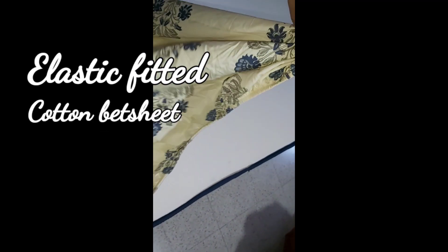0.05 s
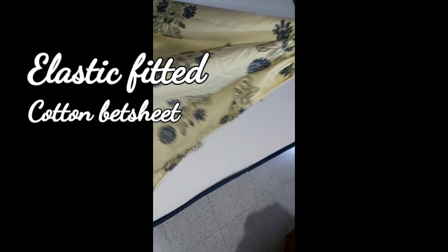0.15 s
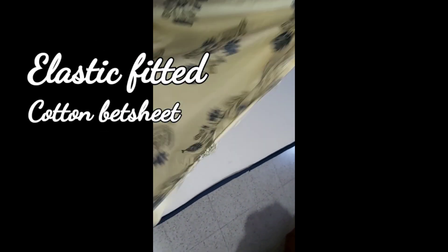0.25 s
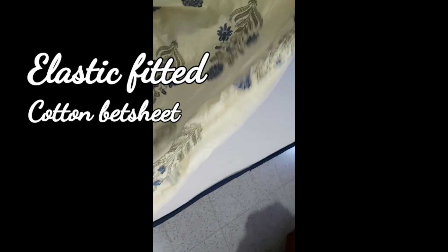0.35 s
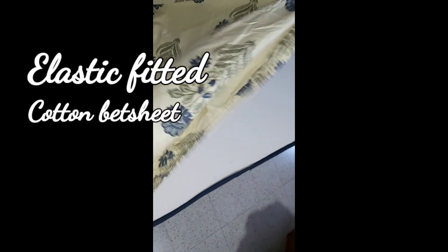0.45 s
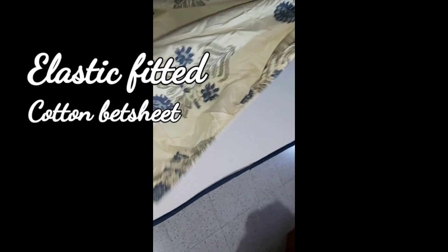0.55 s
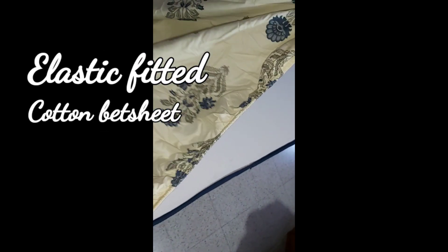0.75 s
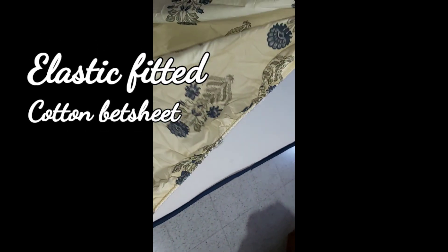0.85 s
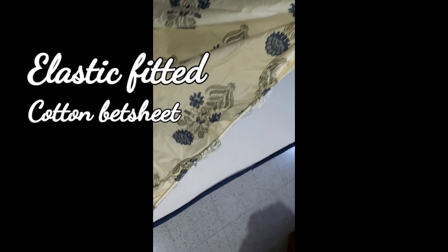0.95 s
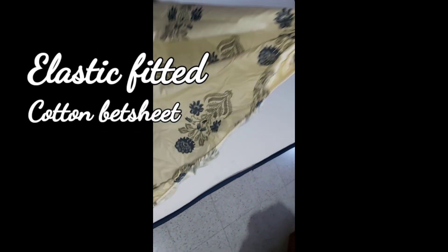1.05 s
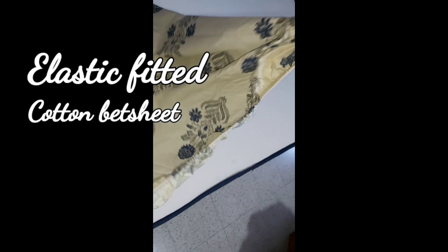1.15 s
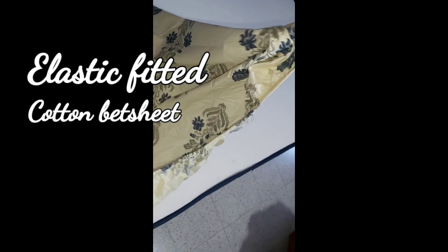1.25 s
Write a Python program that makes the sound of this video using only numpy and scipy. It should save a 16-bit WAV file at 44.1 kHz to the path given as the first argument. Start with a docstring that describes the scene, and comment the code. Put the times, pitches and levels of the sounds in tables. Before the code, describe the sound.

A cotton sheet flaps and lands on a mattress in a small room. Quiet wavering low hum, room noise and a very faint thin high trill come first. From 0.3 to 0.49 seconds, rapid irregular cloth snaps and air puffs, densest near 0.44 with a dull thump and rush of air. A short room ring fades; from about 1.0 a faint fabric hiss rises until 1.3.

```python
"""Cotton sheet flung over a mattress

A sheet flies with a rush and a grainy swish (shaped noise); its folds flap taut (pressure pulses, cracks,
noise bursts), it lands with a thump (decaying modes) and flaps and thump ring a small room (convolution).
Then it is drawn along the bed with a hiss. Behind: a wavering low hum (sine), room noise with a faint
mid drone (shaped noise) and a thin high trill (two narrow fluttering noise bands)."""
import sys
import numpy as np
from scipy import signal
from scipy.fft import rfft, irfft
from scipy.io import wavfile
from scipy.ndimage import uniform_filter1d

SR = 44100
rng = np.random.default_rng(int(sys.argv[2]) if len(sys.argv) > 2 else 0)


def wav_record(signal):
    """Record a signal, one row per channel, as 16-bit PCM in the file named by sys.argv[1]."""
    frames = np.transpose(np.atleast_2d(signal))
    bounded = np.clip(frames, -1, 1)
    # unit amplitude maps onto the largest positive 16-bit level
    quanta = np.round(bounded * 32767).astype(np.int16)
    wavfile.write(sys.argv[1], SR, quanta)


N = 57330

# steady room noise, colour: (frequency [Hz], relative level [dB])
AIR_COLOUR = [(20, -1), (60, -2), (130, 3.5), (215, -6.5), (320, -2.5), (450, -7), (800, -7.5),
              (1100, -5.5), (1550, -8), (2100, -19.5), (3000, -28.5), (5500, -39.5), (15000, -35.5)]
AIR_DB, AIR_PAN_DB = -59.5, -5
# faint mid drone, colour: (frequency [Hz], relative level [dB])
DRONE_COLOUR = [(150, -33), (270, -6.5), (310, -6), (340, 1), (375, -29.5), (600, -51.5)]
# drone envelope: (time [s], level [dB])
DRONE_LEVEL = [(0, -69), (.5, -48), (.6, -60), (.85, -60), (.97, -74), (1.06, -62), (1.3, -60.5)]
# low hum: (time [s], frequency [Hz], level [dB])
HUM_TRACK = [(0, 64.8, -50.5), (.05, 64.9, -60.5), (.21, 63.5, -46.5), (.42, 64.5, -45), (.52, 65.9, -55.5),
             (.62, 69.2, -45.5), (.70, 70.3, -61), (.775, 69.3, -49), (.85, 70.4, -72), (1.08, 67.9, -76.5),
             (1.15, 66.1, -49.5), (1.205, 62, -64.5), (1.26, 63, -50), (1.3, 67, -53)]
HUM_PAN_DB = -6
# thin trill: (time [s], lower band level [dB], upper band level [dB])
TRILL_LEVELS = [(0, -61.5, -80), (.12, -64.5, -76.5), (.25, -70.5, -70.5), (.33, -67.5, -74.5),
                (.5, -79, -73), (.76, -86, -74), (.92, -88, -83.5), (1.03, -91, -80.5), (1.06, -88, -85),
                (1.3, -88, -90)]
TRILL_HZ, TRILL_WIDTH_HZ = (4094, 4557), (210, 92)
TRILL_FLUTTER_DB, TRILL_FLUTTER_HZ = 1.56, 39

# sheet drawn along the mattress, colour: (frequency [Hz], relative level [dB])
DRAG_COLOUR = [(300, -5), (1500, 14.5), (2300, 4), (3050, -7), (3550, 8.5), (4100, -1), (5300, -1),
               (6500, -2), (8000, 3), (9500, -4.5), (11000, -3.5), (13700, -6), (15000, -1), (16000, -14)]
DRAG_START_S, DRAG_RISE_S, DRAG_DB, DRAG_PAN_DB = 1.01, 0.2, -62, -3
DRAG_GRAIN_DB, DRAG_GRAIN_HZ = 0.82, 200
# rush of air under the flying sheet: (time [s], level [dB])
RUSH_LEVEL = [(0, -55), (.27, -63), (.32, -48.5), (.40, -47), (.445, -32.5), (.49, -56.5), (.56, -53.5),
              (.68, -57), (.85, -65.5), (.915, -61), (.95, -92), (1.04, -83), (1.14, -63), (1.3, -57.5)]
# rush colour: (frequency [Hz], relative level [dB])
RUSH_COLOUR = [(20, -25), (45, -14.5), (120, -2.5), (220, -12), (320, -12.5), (450, -15.5), (900, -25.5),
               (2000, -31.5), (4000, -52), (15000, -48)]
RUSH_PAN_DB = -1.5
# cloth sliding on cloth: (time [s], level [dB])
SWISH_LEVEL = [(0, -66.5), (.1, -69.5), (.24, -78), (.28, -71), (.325, -64.5), (.40, -64), (.438, -58.5),
               (.48, -63), (.55, -72.5), (.66, -78.5), (.8, -77.5), (.95, -85), (1.3, -78)]
# swish colour: (frequency [Hz], relative level [dB])
SWISH_COLOUR = [(300, 0), (1500, -0.5), (2200, 8), (3000, -7.5), (3700, 0), (5300, -4.5), (6500, -0.5),
                (8000, 3), (9500, -2.5), (12500, -7), (15500, -12.5)]
SWISH_GRAIN_DB, SWISH_GRAIN_HZ, SWISH_PAN_DB = 1.6, 1300, -5.8

# bed and room resonances set off by the landing: (frequency [Hz], relative level [dB], T60 [s])
MATTRESS_MODES = [(60.3, 0.5, 0.15), (81, -7.5, 0.06), (112, -2.5, 0.19), (190, -7, 0.21), (294.7, 4, 0.19)]
THUMP_S, THUMP_DB, THUMP_ATTACK_S = 0.4345, -32, 0.0103
# folds flapping taut:
# (time [s], air pulse level [dB], pulse half-width [s], cloth snap level [dB], left minus right [dB])
FLAPS = [(0.3025, -70, .0008, -42.5, -21), (0.3039, -36, 0.00074, -56, -0.5),
         (0.3069, -35.5, 0.0012, -64, -11), (0.3556, -26.5, 0.00082, -51, -2),
         (0.376, -30, 0.00085, -59.5, -4), (0.3799, -32.5, 0.00056, -61, -1.5),
         (0.4127, -55, 0.00066, -48, -2), (0.4173, -42.5, 0.00035, -34.5, 0),
         (0.4206, -34.5, 0.0016, -54, -1), (0.4378, -25, 0.0008, -40.5, 11.5),
         (0.4392, -56, 0.00027, -27.5, -11.5), (0.4445, -34, 0.00074, -34.5, -3),
         (0.4505, -28, 0.0015, -40.5, 2), (0.466, -42, 0.00112, -37.5, 3.5),
         (0.4719, -42, 0.00035, -45.5, 22), (0.4757, -31.5, 0.00091, -61, 4.5),
         (0.4785, -46, 0.00026, -54, -7), (0.4860, -37, 0.00045, -47.5, -4)]
PULSE_SKEW = 0.16  # pressure swells more after the dip than before it
CRACK_DB, CRACK_WIDTH_S, CRACK_LEFT_LEAD_S = 0.5, 0.00024, 0.00038  # level re snap
SNAP_LEAD_S, SNAP_ATTACK_S, SNAP_DECAY_S = 0.0013, 0.0009, 0.0026
# filter on the snap noise: (frequency [Hz], gain [dB])
SNAP_COLOUR = [(200, 9), (450, -1), (800, 14.5), (1400, 10), (2000, 8), (2800, -9.5), (4200, -8.5),
               (5500, -23), (15000, -47)]

# standing waves of the room: (frequency [Hz], level [dB], T60 [s])
ROOM_MODES = [(289.3, -55.5, 0.16), (361.2, -85, 0.27), (554, -64, 0.15), (795, -74, 0.24)]
# reverberant tail, colour: (frequency [Hz], relative level [dB])
ROOM_COLOUR = [(50, -2), (130, -20), (300, -11.5), (700, 0), (2000, -0.5), (6000, 3.5), (15000, -14.5)]
ROOM_T60_S, ROOM_DB, ROOM_DELAY_S = 0.36, -7.5, 0.006
# likeness of the two channels of each noise: (frequency [Hz], correlation [-1..1])
LIKENESS = [(60, 1), (300, 0.83), (550, 0.46), (900, -0.087), (2000, 0.11), (6000, 0.034)]
# colour difference of the two microphones: (frequency [Hz], left minus right [dB])
MICROPHONE_COLOUR = [(100, -0.5), (300, -0.5), (500, 1.5), (800, -2), (1100, 1.5), (1800, -2), (3300, -4.5),
                     (4400, 5), (6000, 4), (8000, -1.5), (12000, 5.5), (15500, 0.5)]
TOP_HZ = 15700


def undb(db):
    """Decibels to gain."""
    return 10 ** (np.asarray(db) / 20)


def unit(x):
    """Scale to rms 1."""
    return x / np.sqrt(np.mean(x ** 2))


def curve(table, column=1):
    """One table column, linearly interpolated in time."""
    rows = np.array(table)
    return np.interp(np.arange(N) / SR, rows[:, 0], rows[:, column])


def by_frequency(points):
    """(Hz, value) points interpolated on a log-frequency axis."""
    hz, value = np.array(points).T
    bins_hz = np.fft.rfftfreq(N, 1 / SR) + 1  # offset avoids log(0)
    return np.interp(np.log(bins_hz), np.log(hz), value)


def colour(x, points):
    """Filter by (Hz, dB) points."""
    return irfft(rfft(x) * undb(by_frequency(points)), N)


def pan(db):
    """Left and right gains for a level difference, mean power 1."""
    gains = undb(np.array([[db], [-db]]) / 2)
    return gains / np.sqrt(np.mean(gains ** 2))


def noise(points):
    """Coloured stereo noise of rms 1, alike in the bass and nearly unrelated in the treble."""
    like = np.clip(by_frequency(LIKENESS), -1, 1)
    mid, side = rfft(rng.standard_normal((2, N))) * np.sqrt([1 + like, 1 - like])
    stereo = irfft(np.array([mid + side, mid - side]), N)
    return unit(colour(stereo, points))


def flicker(rate_hz):
    """Smoothed random wander of rms 1: white noise averaged over 1 / rate_hz."""
    window = max(int(SR / rate_hz), 1)
    return unit(uniform_filter1d(rng.standard_normal(N), window))


def decay(t, t60_s):
    """Exponential decay, 60 dB down at t60_s."""
    return np.exp(-np.log(1000) * t / t60_s)


def ring(modes, t):
    """Sum of decaying sines, one per mode."""
    return sum(undb(db) * np.sin(2 * np.pi * hz * t) * decay(t, t60_s) for hz, db, t60_s in modes)


def room_noise():
    """Steady broadband noise plus a narrower mid drone that swells and fades."""
    steady = noise(AIR_COLOUR) * undb(AIR_DB)
    drone = noise(DRONE_COLOUR) * undb(curve(DRONE_LEVEL))
    return (steady + drone) * pan(AIR_PAN_DB)


def hum():
    """A low sine that swells, fades and wavers in pitch: phase is the integral of frequency."""
    phase = 2 * np.pi * np.cumsum(curve(HUM_TRACK, column=1)) / SR
    tone = np.sqrt(2) * np.sin(phase)  # rms 1
    return tone * undb(curve(HUM_TRACK, column=2)) * pan(HUM_PAN_DB)


def trill():
    """Two narrow high noise bands with randomly fluttering levels."""
    bins_hz = np.fft.rfftfreq(N, 1 / SR)
    out = np.zeros((2, N))
    for column, (hz, width_hz) in enumerate(zip(TRILL_HZ, TRILL_WIDTH_HZ), start=1):
        bell = np.exp(-((bins_hz - hz) / width_hz) ** 2 / 2)
        band = unit(irfft(rfft(rng.standard_normal((2, N))) * bell, N))
        level_db = curve(TRILL_LEVELS, column) + TRILL_FLUTTER_DB * flicker(TRILL_FLUTTER_HZ)
        out += band * undb(level_db)
    return out


def drag(t):
    """Cotton pulled over the mattress cover: friction hiss that ramps up, then holds with a slight grain."""
    ramp = np.clip((t - DRAG_START_S) / DRAG_RISE_S, 0, 1)
    level_db = DRAG_DB + DRAG_GRAIN_DB * flicker(DRAG_GRAIN_HZ)
    return noise(DRAG_COLOUR) * ramp * undb(level_db) * pan(DRAG_PAN_DB)


def air_rush():
    """Air moved by the flying sheet: low noise following the rush envelope."""
    return noise(RUSH_COLOUR) * undb(curve(RUSH_LEVEL)) * pan(RUSH_PAN_DB)


def swish():
    """Weave sliding on weave: noise with a fast random grain in level."""
    level_db = curve(SWISH_LEVEL) + SWISH_GRAIN_DB * flicker(SWISH_GRAIN_HZ)
    return noise(SWISH_COLOUR) * undb(level_db) * pan(SWISH_PAN_DB)


def thump(t):
    """The sheet pushes its cushion of air onto the mattress, exciting decaying modes."""
    age = np.maximum(t - THUMP_S, 0)
    attack = np.minimum(age / THUMP_ATTACK_S, 1)
    return undb(THUMP_DB) * attack * ring(MATTRESS_MODES, age)


def pressure_pulse(t, width_s):
    """Pressure swells, dips at t = 0 and rebounds: a skewed second derivative of a Gaussian."""
    u = t / width_s
    return (u ** 2 - 1) * (1 + PULSE_SKEW * u) * np.exp(-u ** 2 / 2)


def crack(t):
    """A sharp stereo up-down pressure stroke, earlier on the left."""
    v = (t + CRACK_LEFT_LEAD_S * np.array([[1], [0]])) / CRACK_WIDTH_S
    return undb(CRACK_DB) * -v * np.exp((1 - v ** 2) / 2)


def snap_envelope(t):
    """Cloth noise burst: linear attack starting just before the flap, exponential decay."""
    age = np.maximum(t + SNAP_LEAD_S, 0)
    return np.minimum(age / SNAP_ATTACK_S, 1) * np.exp(-age / SNAP_DECAY_S)


def flaps(t):
    """Each fold pulled taut gives a pressure pulse, a crack and a short burst of cloth noise."""
    air, rub = np.zeros((2, N)), np.zeros((2, N))
    for at_s, pulse_db, width_s, snap_db, pan_db in FLAPS:
        since = t - at_s
        pulse = undb(pulse_db) * pressure_pulse(since, width_s)
        air += pan(pan_db) * (pulse + undb(snap_db) * crack(since))
        rub += pan(pan_db) * undb(snap_db) * snap_envelope(since)
    return air + colour(rub * rng.standard_normal((2, N)), SNAP_COLOUR)


def room(x, t):
    """Reverberation: convolution with a decaying diffuse tail and a few standing waves."""
    tail = noise(ROOM_COLOUR) * decay(t, ROOM_T60_S) * (t > ROOM_DELAY_S)
    tail = unit(tail) / np.sqrt(N)  # mean energy per channel 1
    response = undb(ROOM_DB) * tail + ring(ROOM_MODES, t)
    return signal.fftconvolve(x, response, axes=1)[:, :N]


def scene():
    """Background, sliding cloth, then the blows and their reverberation."""
    t = np.arange(N) / SR
    background = room_noise() + hum() + trill()
    cloth = drag(t) + air_rush() + swish()
    blows = thump(t) + flaps(t)
    return background + cloth + blows + room(blows, t)


def record(dry):
    """The microphones differ in colour, half the difference each way; a steep low-pass cuts the top."""
    tilt_db = by_frequency(MICROPHONE_COLOUR) * np.array([[1], [-1]]) / 2
    heard = irfft(rfft(dry) * undb(tilt_db), N)
    low_pass = signal.ellip(10, .1, 70, TOP_HZ, fs=SR, output="sos")
    return signal.sosfilt(low_pass, heard)


dry = scene()
out = record(dry)
wav_record(out)
```